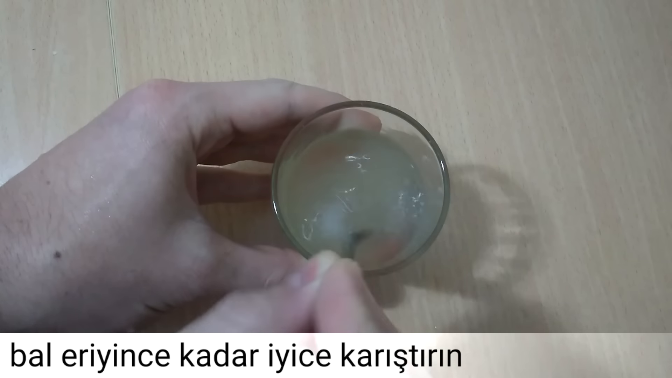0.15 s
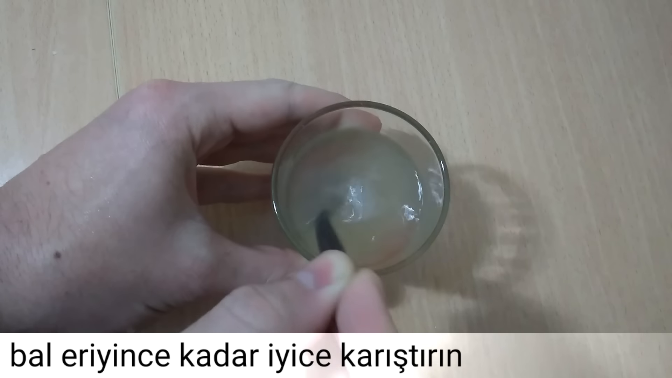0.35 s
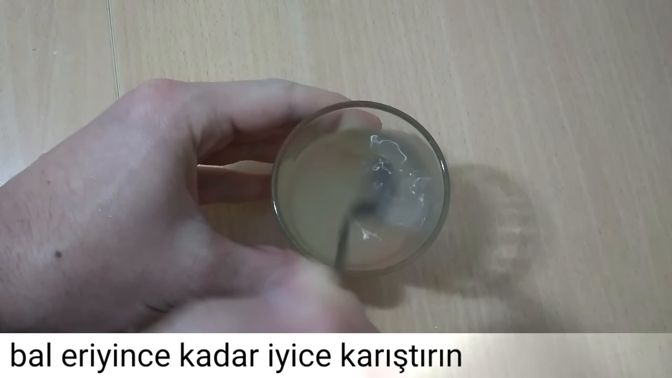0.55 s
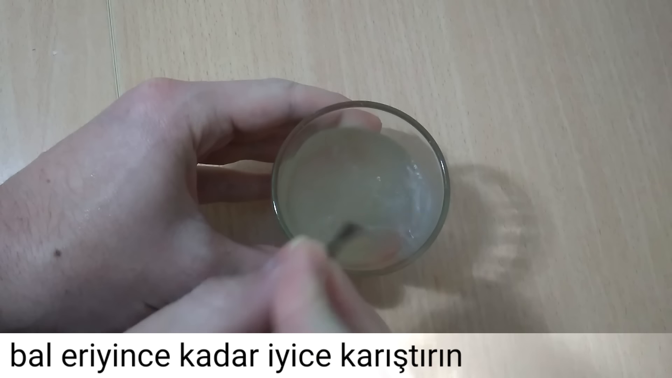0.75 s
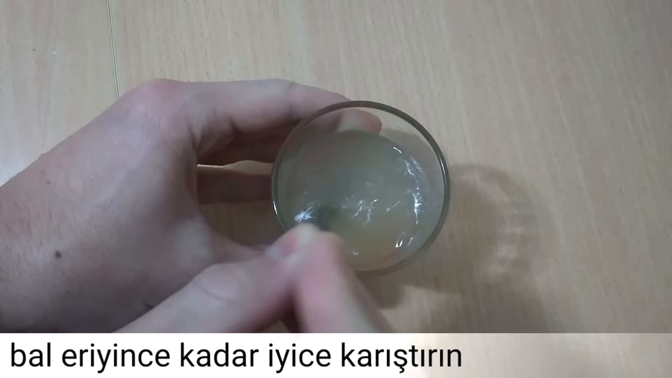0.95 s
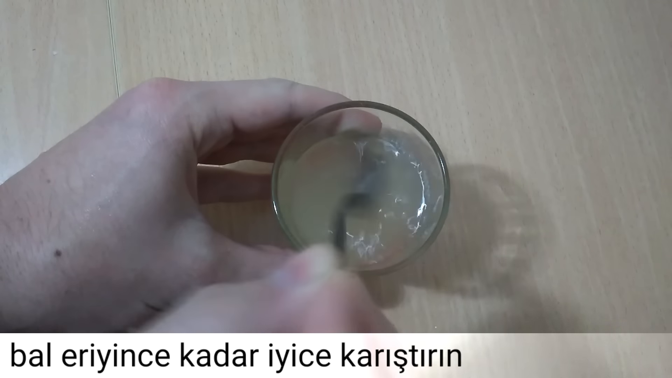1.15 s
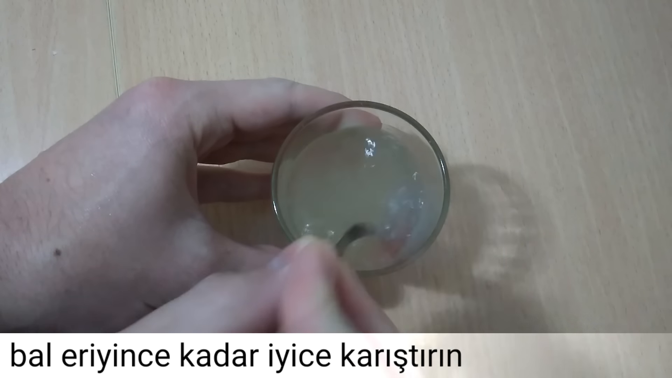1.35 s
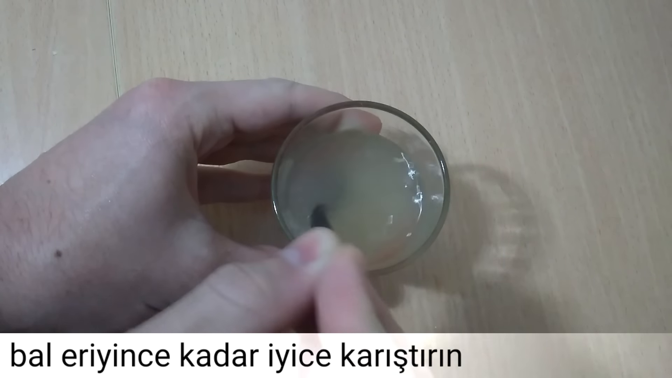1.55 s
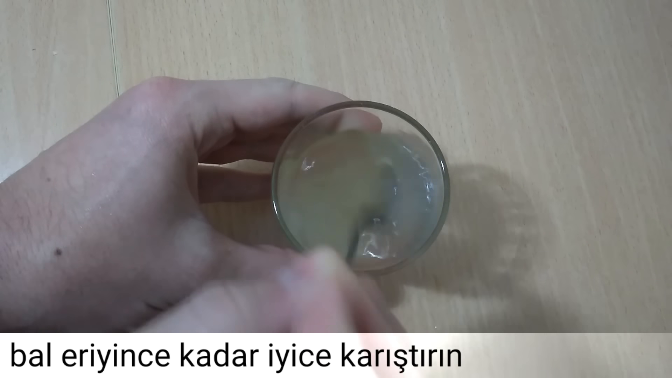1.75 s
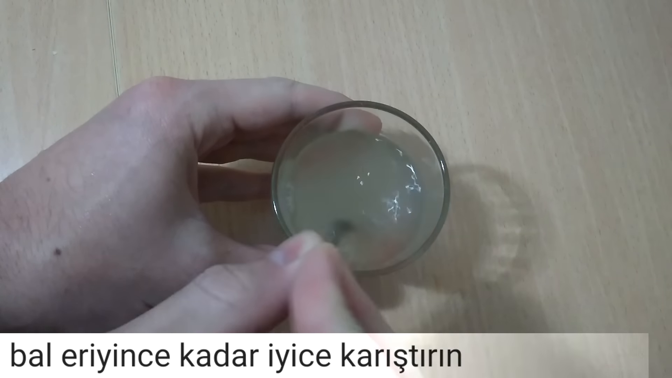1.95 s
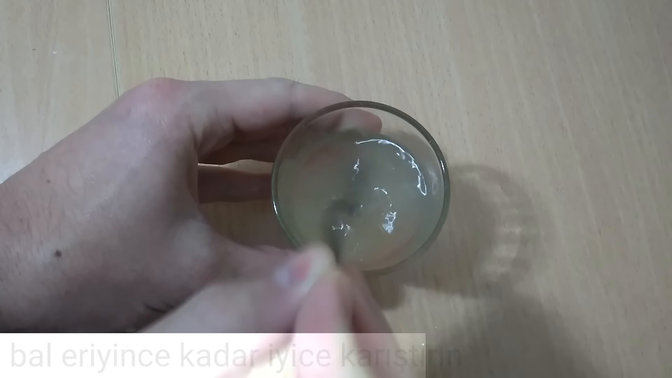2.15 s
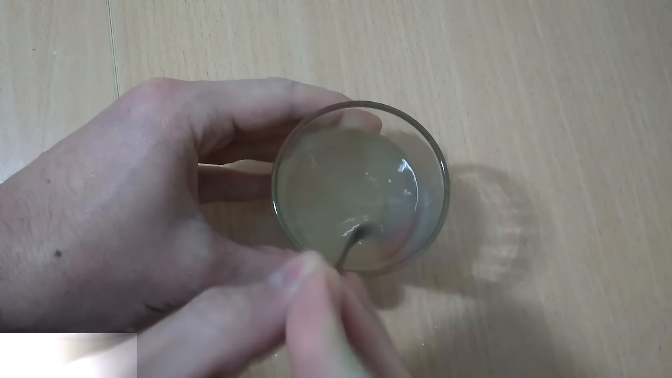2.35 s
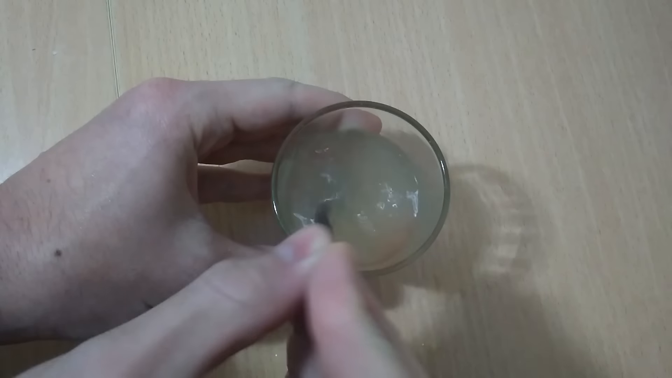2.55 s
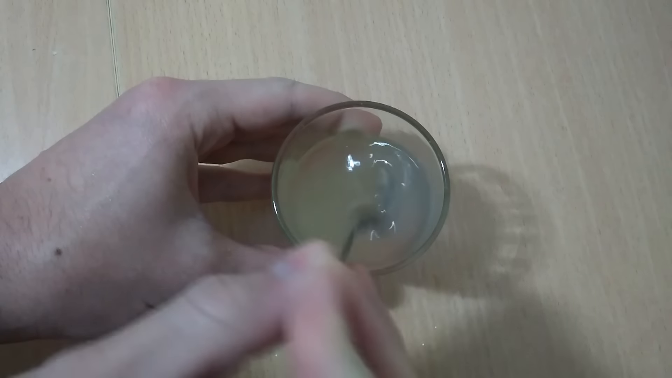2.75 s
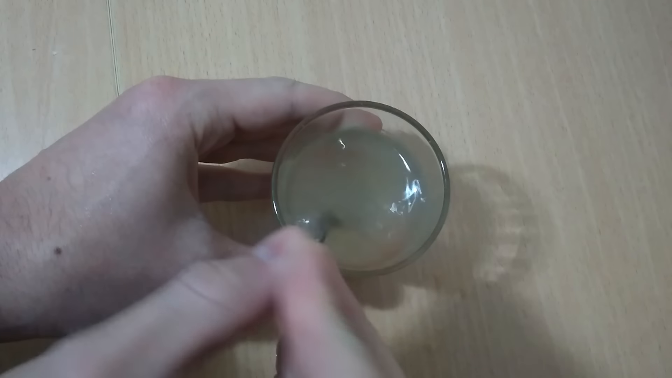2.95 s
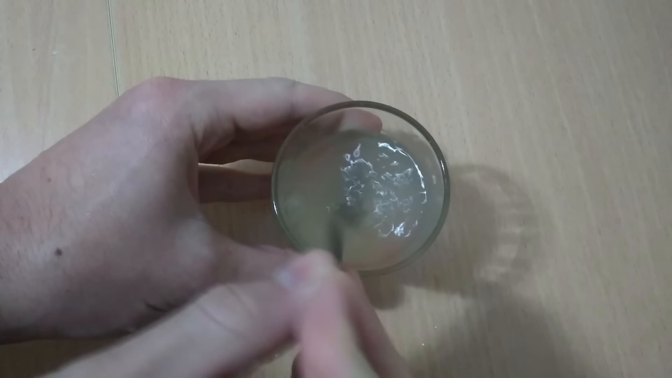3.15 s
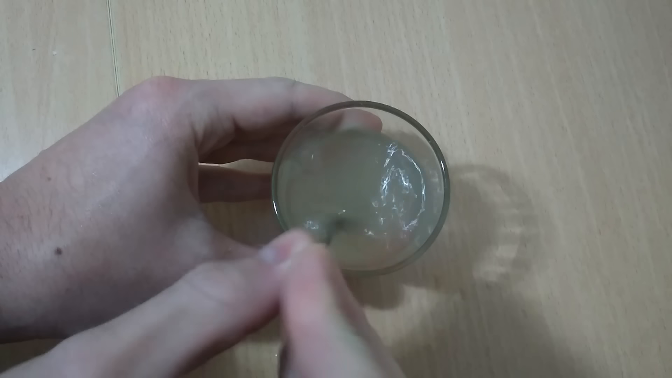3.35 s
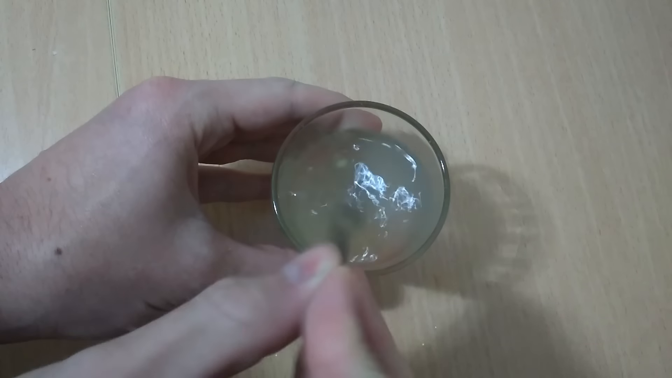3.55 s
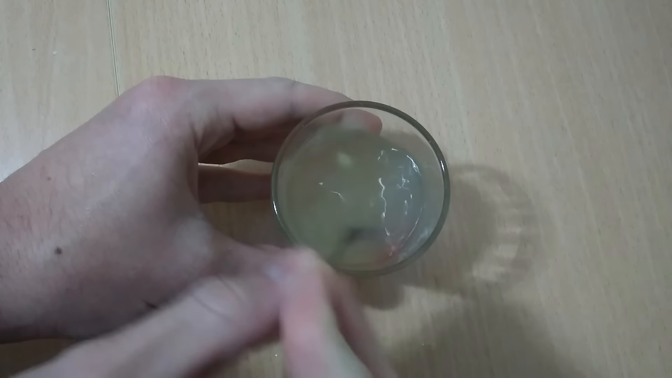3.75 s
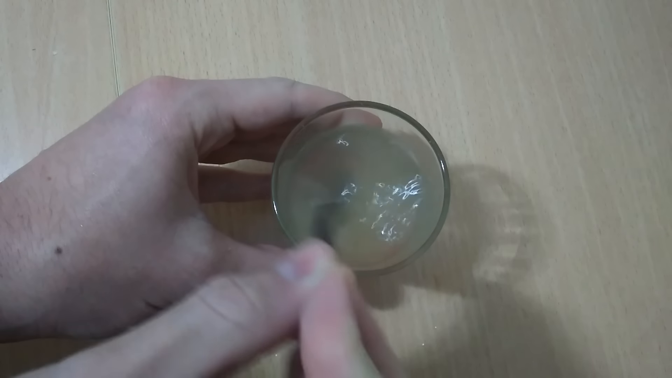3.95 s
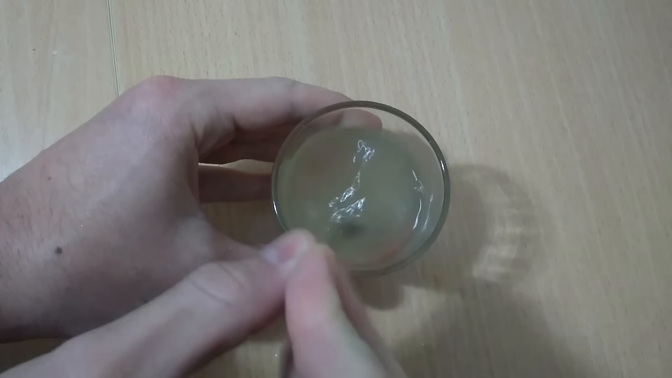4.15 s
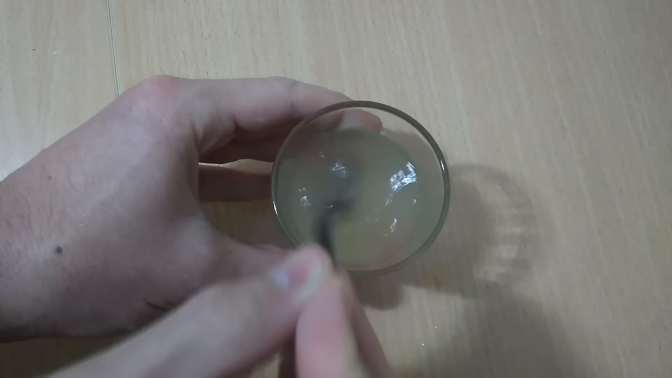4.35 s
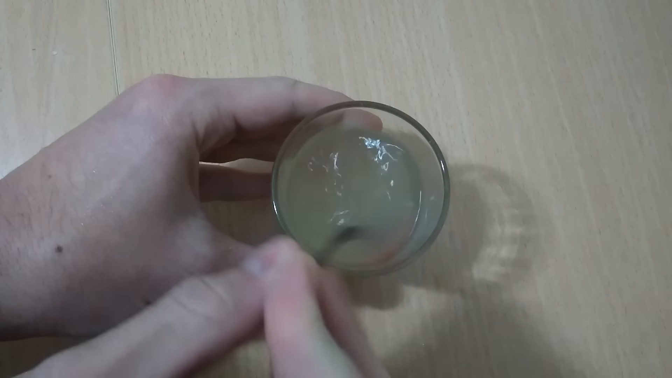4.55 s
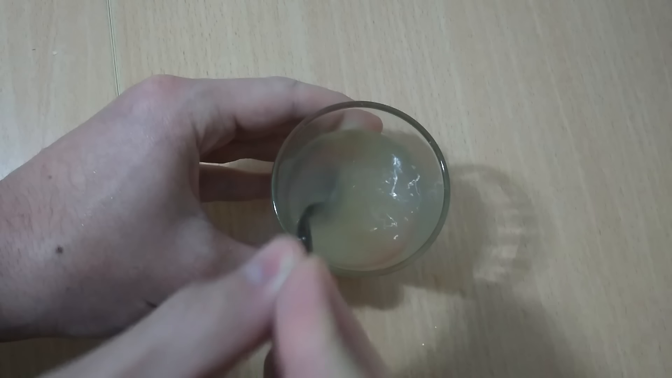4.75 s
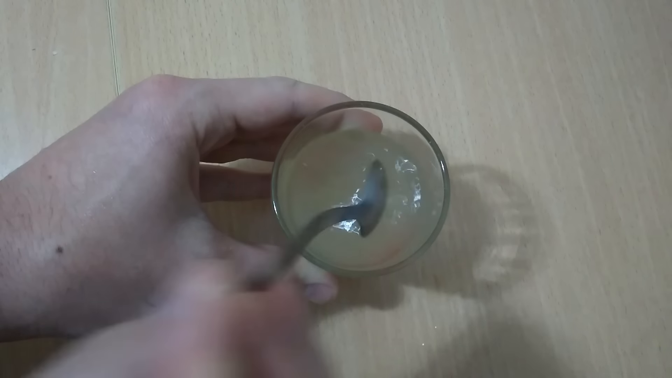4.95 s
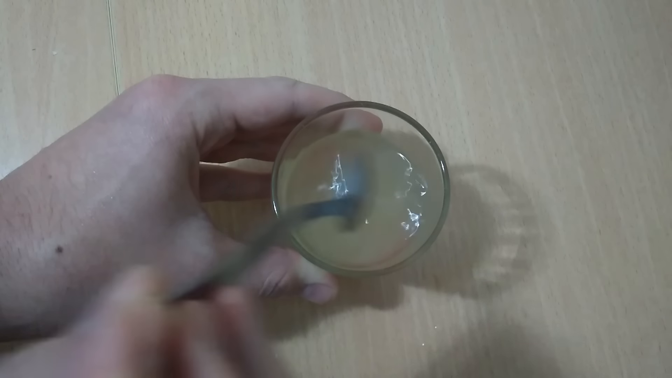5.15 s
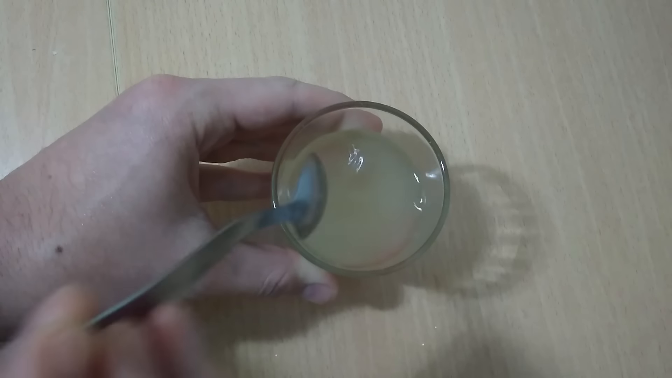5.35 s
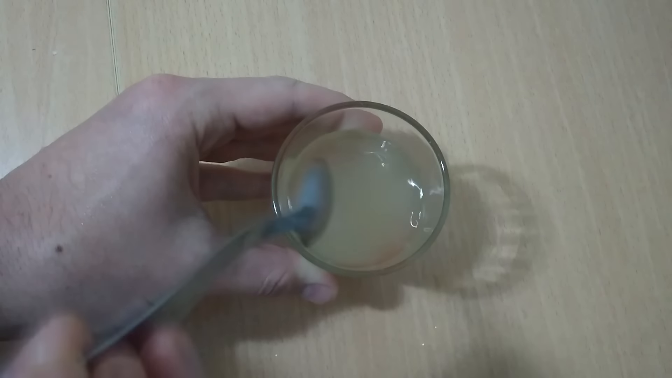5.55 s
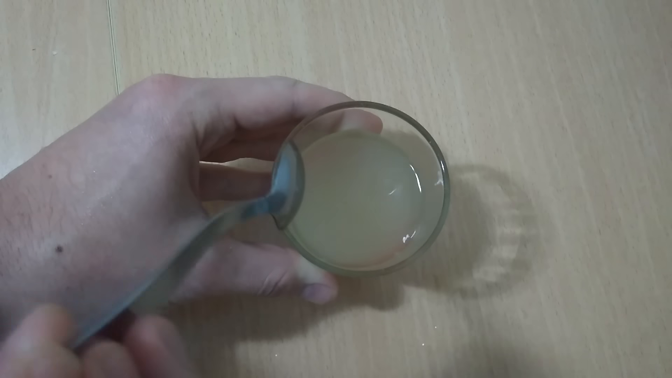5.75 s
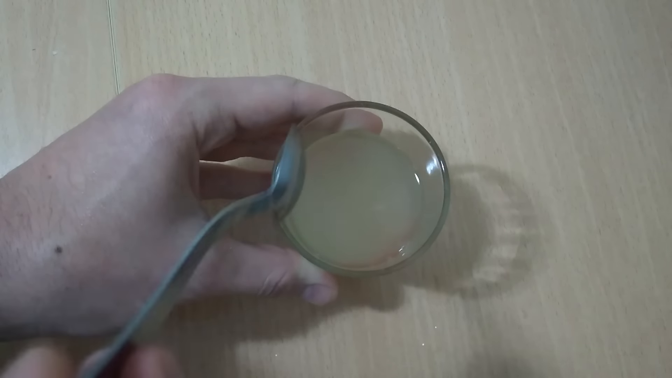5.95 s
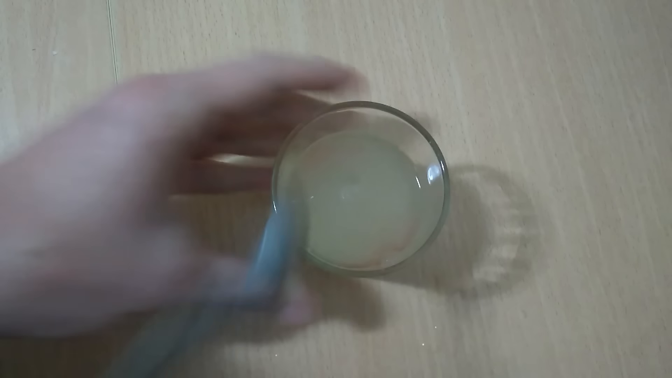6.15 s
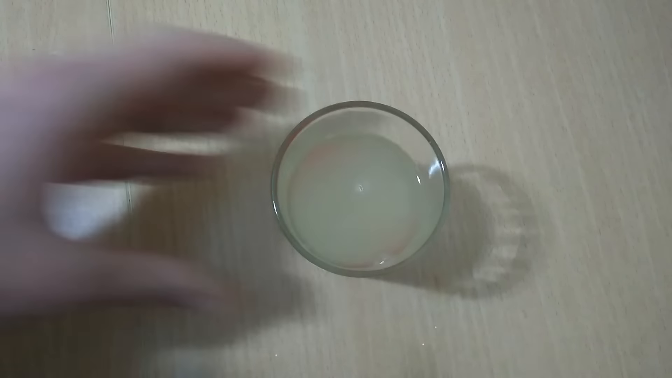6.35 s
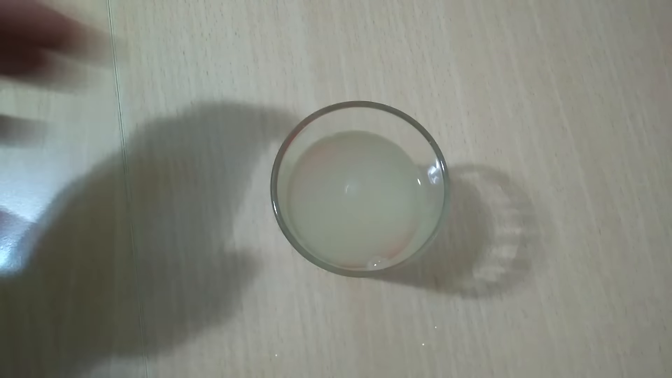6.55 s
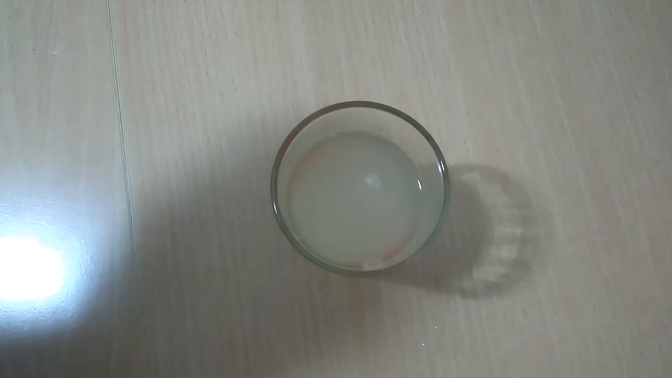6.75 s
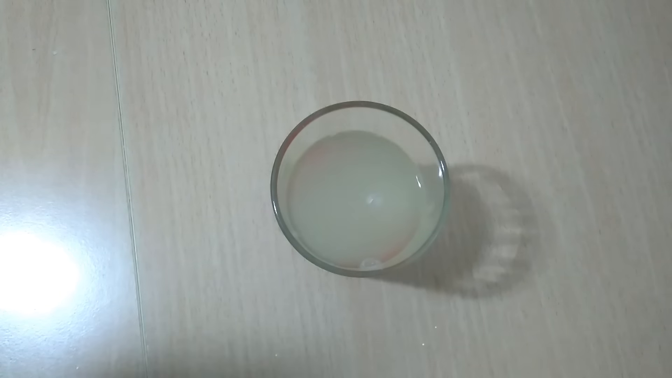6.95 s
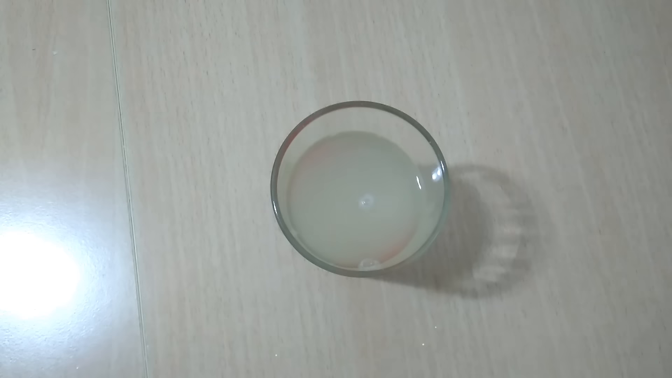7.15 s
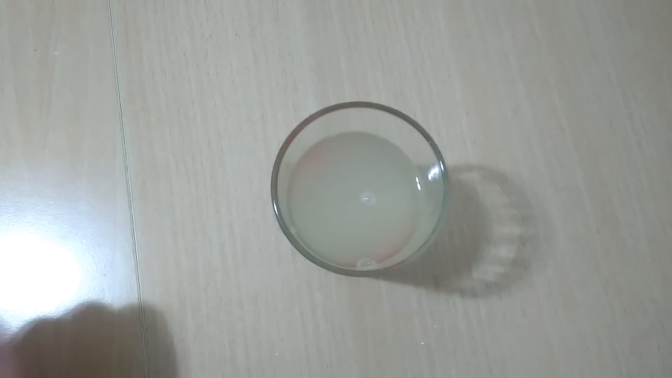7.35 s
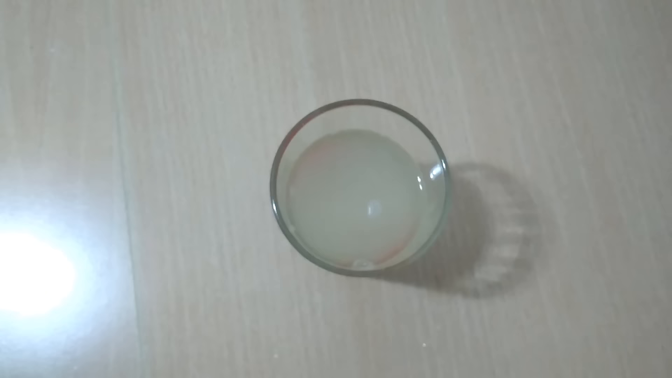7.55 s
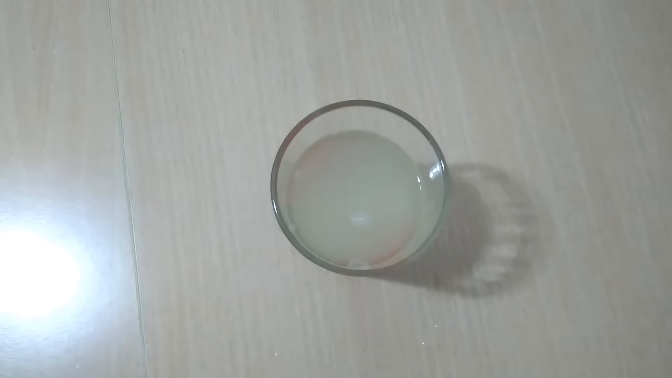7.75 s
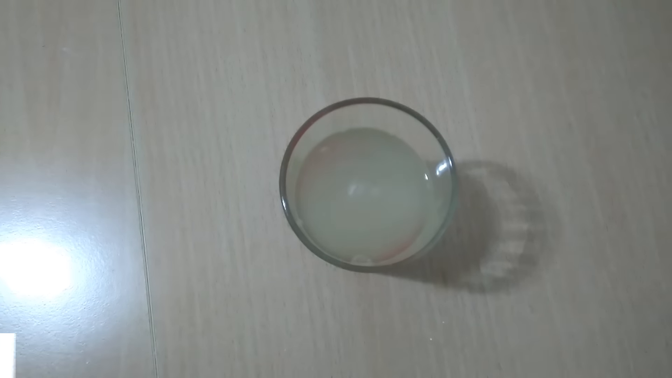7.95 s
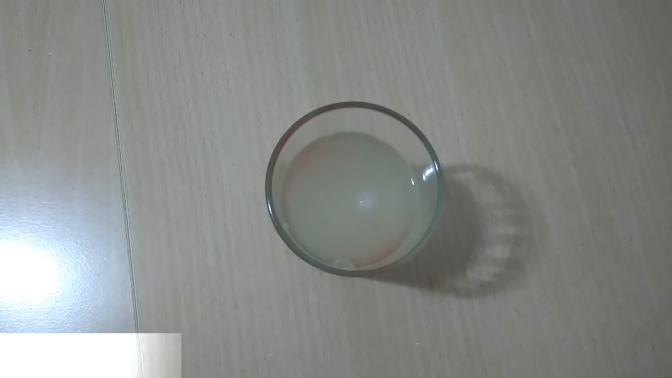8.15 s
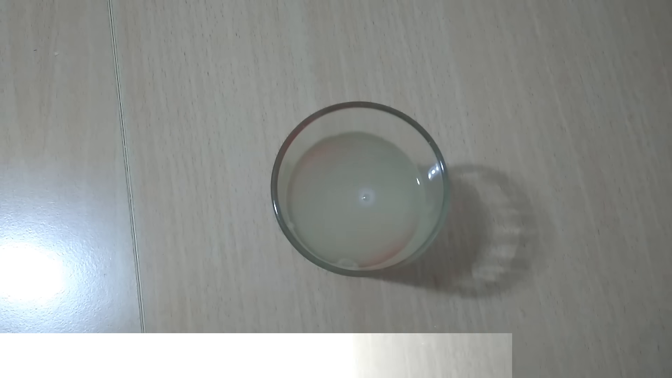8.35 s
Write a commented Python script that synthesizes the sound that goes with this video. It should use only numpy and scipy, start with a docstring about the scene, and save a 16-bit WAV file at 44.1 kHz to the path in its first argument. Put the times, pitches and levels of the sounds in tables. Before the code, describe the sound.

Indoors, a spoon circles in a held glass of liquid: short clinks in irregular pairs and clusters, little skids and soft sloshing between. Low electrical hum is strong at first, then weak beneath a steady hiss. After a short gap come sharp rim taps, a pause, and the spoon landing and bouncing to rest further from the microphone, with more room echo.

```python
"""A steel teaspoon stirs a drink in a hand-held glass, over a mains hum that soon drops and a steady faint hiss.
Each contact rings the damped glass and knocks the table; the sloshing drink bends the low wall tones.
Skids, bubbles and wash fill the gaps; then the spoon is lifted, with a soft bump, and taps the rim.
Last it clatters down further off, on resonances of its own. A small hard room answers every contact."""
import sys
import numpy as np
from scipy import signal
from scipy.fft import rfft, irfft
from scipy.io import wavfile
from scipy.ndimage import map_coordinates

SR = 44100
rng = np.random.default_rng(int(sys.argv[2]) if len(sys.argv) > 2 else 0)


def log_audio(samples):
    """Write samples as a 16-bit WAV file to the path given in sys.argv[1]."""
    # one column per channel
    frames = np.atleast_2d(samples).T
    # limit to full scale, then quantise
    limited = np.clip(frames, -1, 1)
    pcm = np.round(limited * 32767).astype(np.int16)
    wavfile.write(sys.argv[1], SR, pcm)


N = 370881
TIME = np.arange(N) / SR  # seconds through the scene
AGE = TIME[:SR // 2]  # seconds since a contact

# Modes of the glass with the spoon against it. Each row: frequency in Hz, relative level in dB, t60 in seconds.
GLASS_MODES = [(273, -2.5, 0.081), (385, -3, 0.1), (745.6, -13, 0.1), (1516, -1.5, 0.027),
               (1612, -3, 0.026), (2098, 1, 0.024), (2215, -1, 0.036), (2560, 4, 0.011), (3030, 6, 0.016),
               (3810, -5.5, 0.038), (4250, 1.5, 0.022), (4450, 4.5, 0.0093), (5140, -4, 0.026),
               (5465, -7.5, 0.019), (6280, -5, 0.021), (6720, 3.5, 0.017), (7054, 3, 0.012),
               (7350, 4, 0.013), (7770, -3, 0.0071), (8390, -2, 0.013), (9090, -2.5, 0.015),
               (9920, 1, 0.015), (10550, -5, 0.018), (12200, -10.5, 0.013), (12300, -18, 0.0091)]
# Upper edges in Hz of the knock, wall, rim, middle and bright families of modes; the top family lies above.
FAMILY_EDGES_HZ = [1000, 1850, 2400, 4800, 9000]


def undb(db):
    """Decibels to gain."""
    return 10 ** (np.asarray(db) / 20)


def unit(x):
    """Scale to unit energy."""
    return x / np.sqrt(np.sum(x ** 2) + 1e-18)


def blend(a, b, share):
    """Unit-energy mix in which b has the given share of the energy."""
    return unit(np.sqrt(1 - share) * unit(a) + np.sqrt(share) * unit(b))


def fade(t60):
    """Exponential decay of a struck thing, 60 dB down after t60 seconds."""
    return np.exp(-np.log(1000) * AGE / t60)


def touch(rise_s):
    """A contact builds up over a moment."""
    return 1 - np.exp(-(AGE / rise_s) ** 2)


def swell(s, width_s):
    """A smooth rise and fall around a time."""
    return np.exp(-((TIME - s) / width_s) ** 2)


def walk(rate, size):
    """Smooth random drift with a spread near 1, through `rate` random points a second."""
    knots = rng.standard_normal(int(size / SR * rate) + 4)
    return map_coordinates(knots, [np.arange(size) / SR * rate + 1], order=3, mode="nearest")


def band(x, lo_hz, hi_hz, order=2):
    """Butterworth band-pass."""
    edges = [lo_hz, min(hi_hz, SR / 2 - 1)]
    return signal.sosfilt(signal.butter(order, edges, "band", fs=SR, output="sos"), x)


def ring(hz, t60, bend=0):
    """One decaying mode of unit energy; bend shifts its pitch by a fraction as it rings."""
    phase = 2 * np.pi * np.cumsum(hz * (1 + bend + 0 * AGE)) / SR
    return unit(np.sin(phase + rng.uniform(0, 2 * np.pi)) * fade(t60))


def crack(lo_hz, hi_hz, t60):
    """The dense, quickly damped ringing of a contact: decaying band noise of unit energy."""
    return unit(band(rng.standard_normal(len(AGE)) * fade(t60), lo_hz, hi_hz))


def add(track, s, sound):
    """Mix a sound in at a time."""
    i = max(int(s * SR), 0)
    track[i:i + len(sound)] += sound[:max(N - i, 0)]


def stirring(lift_s=5.4):
    """The spoon circles in the drink, then is lifted and tapped on the rim; each contact is a clink."""
    # Spoon on glass. Each row: start in seconds, strength in dB before the common gain,
    # depth from 0 at the rim to 1 at the bottom, favoured ring in dB relative to the strength,
    # favoured ring in Hz, bright ring in Hz.
    clinks = [(0.285, -59.5, 0.63, 0.5, 2720, 7200), (0.3016, -55.5, .4, -1, 1600, 6400),
              (0.3924, -42, 0.72, -18, 5270, 6780), (0.4668, -57, 0.79, -17, 5070, 7000),
              (0.5184, -32.5, 0.68, -13, 2510, 6850), (0.941, -49, 0.49, -8, 5240, 7700),
              (1.0372, -35.5, 0.62, -19, 2170, 6920), (1.122, -37.5, 0.92, -26, 2820, 6500),
              (1.6677, -37.5, 0.73, -13, 5120, 7150), (1.7259, -41, 0.94, -20, 5110, 7000),
              (2.135, -61, 0.29, -26, 4670, 7700), (2.1666, -38.5, 0.62, 3, 6810, 6820),
              (2.2583, -35.5, 0.91, -8, 2110, 6900), (2.325, -45.5, 0.89, -10, 4270, 7500),
              (2.4169, -31.5, 0.19, -7, 5120, 7320), (2.424, -37, 0.56, -3, 3960, 7060),
              (2.6999, -46.5, 0.87, -17, 3210, 6600), (2.7167, -34, 0.87, -14.5, 4370, 5260),
              (3.149, -45.5, 0.77, -7.5, 4900, 7320), (3.2182, -38, 0.99, -12.5, 3080, 7500),
              (3.3669, -35.5, 0.77, 1.5, 3170, 7330), (3.566, -49, 0.54, -11, 3040, 6840),
              (3.6362, -37.5, 0.89, -12.5, 2990, 7050), (4.012, -41, 0.61, -16, 4500, 6570),
              (4.0391, -35.5, 0.56, -11, 1520, 6980), (4.1189, -46, 0.78, -15, 5300, 7270),
              (4.1631, -46, 0.21, -21.5, 3940, 7540), (4.2186, -28.5, 0.47, -18, 2880, 7066),
              (4.418, -53, .62, -13.5, 2860, 7100), (4.469, -39, 0.88, -12, 2560, 7120),
              (4.5128, -44, 0.91, -15, 2840, 7140), (4.6115, -31, 0.45, -4.5, 4420, 8330),
              (4.9291, -33, 0.38, -8.5, 5300, 7050), (5.0703, -30.5, 0.32, -7.5, 4370, 6550),
              (5.7305, -32.5, 0.17, -8.5, 5260, 6520), (5.9475, -29, 0, -19.5, 3950, 7160),
              (5.9515, -36, 0, -14.5, 2180, 7500), (5.9776, -29.5, 0.35, -4, 5500, 7740),
              (6.139, -40.5, 0.32, -24, 4870, 7960), (6.3804, -46, 0.25, -20, 2040, 7310)]
    out = np.zeros(N)
    for s, *blow in clinks:
        add(out, s, undb(26) * clink(*blow, swirl=float(s < lift_s)))
    return out


def clink(strength_db, depth, ring_db, ring_hz, clink_hz, swirl):
    """One contact: its depth sets each family of modes, bright near the rim and a dull knock near the bottom."""
    # How each family of modes answers a contact, by family name.
    # Each row: gain in dB at the rim, in dB at the waist, in dB at the bottom.
    answers = {"knock": (-34.5, -6, -0.65), "wall": (-26.5, -15.5, 0), "rim": (-16, -13, -13.5),
               "middle": (-23.5, -11, -23.5), "bright": (0, 0, -10), "top": (-4.5, -16, -42)}
    waist = 0.6  # depth below which the drink muffles the clink
    knock_db, wall_db, rim_db, middle_db, clink_db, top_db = (
        strength_db + np.interp(depth, [0, waist, 1], answer) for answer in answers.values())

    scatter_db, detune = 2.0, 0.008  # random spread of mode level, and of pitch as a fraction
    slosh = swirl * 0.02 * walk(24, len(AGE))
    families = np.zeros((len(FAMILY_EDGES_HZ) + 1, len(AGE)))
    for hz, db, t60 in GLASS_MODES:
        # the moving drink loads the low modes most
        bend = detune * rng.standard_normal() + slosh * min(2.5, (1500 / hz) ** 2)
        level = undb(db + scatter_db * rng.standard_normal())
        families[np.searchsorted(FAMILY_EDGES_HZ, hz)] += level * ring(hz, t60, bend)
    knock, wall, rim, middle, bright, top = families

    # the chattering point of contact favours two resonances
    chatter = 0.012 * walk(460, len(AGE))
    favoured = ring(ring_hz, 0.022, 0.025 * walk(500, len(AGE)))
    # steel on glass adds a dense crack
    knock = blend(knock, crack(260, 490, 0.11), 0.16)
    wall = blend(wall, crack(1240, 2000, 0.04), 0.31)
    middle = blend(middle, crack(2300, 5100, 0.056), 0.5)
    bright = blend(bright, crack(4500, 8200, 0.024), 0.33)
    bright = blend(bright, ring(clink_hz, 0.021, chatter), 0.37)
    top = blend(top, crack(7100, 11200, 0.016), 0.33)

    attack = touch(0.0012)
    parts = [(wall, wall_db - 0.5), (rim, rim_db - 3), (middle, middle_db),
             (favoured, strength_db + ring_db), (bright, clink_db), (top, top_db)]
    out = sum(undb(db) * unit(part * attack) for part, db in parts)
    # the low knock blooms a little late
    out += undb(knock_db - 4.5) * unit(knock * touch(0.0037))
    # the table top ticks, more while stirring, and shakes faintly
    out += undb(strength_db - 26.5 + 9 * swirl) * unit(crack(500, 1500, 0.029) * attack)
    out += undb(knock_db - 16.5) * unit(crack(30, 190, 0.39) * touch(0.01))
    # the circling spoon drags on for a moment with a fine grit
    grit = crack(1500, 6900, 0.3) * undb(4.2 * walk(300, len(AGE))) * touch(0.015)
    out += swirl * undb(clink_db - 21) * unit(grit)
    # the glass sings on: a wall tone, longer while stirring, a rim tone, higher when calm, and a bright tone
    song = undb(wall_db - 8) * ring(1545, 0.0322 + 0.161 * swirl, 1.5 * slosh)
    song += undb(rim_db - 7.5) * ring(2200 - 85 * swirl, 0.22, slosh / 3)
    bright_bend = detune / 2 * rng.standard_normal() + 0.3 * chatter
    song += undb(clink_db - 15 - 10 * swirl) * ring(5220, 0.35, bright_bend)
    return out + song * attack


def skids(grit_db=5):
    """Stick and slip chatter of the dragging spoon drives the high modes of the glass."""
    # Spoon dragging on the glass. Each row: start in seconds, length in seconds, level in dB.
    drags = [(1.168, 0.079, -62), (2.181, .015, -52.5), (2.432, 0.0087, -50), (3.157, 0.064, -59),
             (4.022, .012, -59.5), (4.216, 0.0085, -54), (5.967, 0.029, -39), (6.14, 0.016, -49),
             (6.267, 0.042, -55.5)]
    out = np.zeros(N)
    for s, length_s, db in drags:
        slips = rng.standard_normal(len(AGE)) * undb(grit_db * walk(870, len(AGE)))
        slips *= np.exp(-(AGE / length_s) ** 2) * touch(0.0013)
        body = sum(undb(mode_db) * ring(hz, t60) for hz, mode_db, t60 in GLASS_MODES
                   if hz > FAMILY_EDGES_HZ[3])
        rub = band(signal.fftconvolve(slips, body), 5000, 5900, order=1)
        # a longer drag carries more energy
        add(out, s, undb(db) * np.sqrt(length_s * SR) * unit(rub))
    return out


def drink(scuff_db=7, stop_s=4.3):
    """Small bubbles chirp upward over a noise wash; the drink gulps once and the spoon scuffs the bottom."""
    # Bubbles in the swirl. Each row: start in seconds, level in dB before the common gain, starting pitch in Hz.
    bubbles = [(1.868, -64, 1680), (2.887, -61, 2370), (3.097, -62.5, 1320), (3.101, -66, 2700),
               (3.149, -45, 1850), (3.752, -50.5, 1616), (3.819, -58.5, 2630), (4.162, -51.5, 1340),
               (4.189, -61, 2420)]
    out = np.zeros(N)
    for s, db, hz in bubbles:
        rise = 0.12 * (1 - fade(0.22))  # fraction of the pitch
        bubble = ring(hz, 0.05, rise) + undb(-12.5) * crack(1200, 4500, 0.044)
        add(out, s, undb(db + 22.5) * bubble * touch(0.0014))
    # the wash is strongest at the start and near 4.6 s, and runs on at a lower level
    wash_share = np.interp(TIME, [0, 1.5, 4.6, 5.3], [0.54, 0.36, 0.62, 0.35])
    wash = band(rng.standard_normal(N), 250, 2800, order=1) * undb(-68.5 + 0.82 * walk(6.3, N))
    gulp = undb(-33) * swell(1.201, 0.094) * band(rng.standard_normal(N), 154, 352)
    # the spoon scuffs the bottom now and then as it circles
    scuff_level = undb(-81.5 + scuff_db * np.tanh(walk(14, N)) + 3 * walk(250, N))
    scuff = scuff_level * band(rng.standard_normal(N), 2200, 3400)
    return out + wash_share * wash + gulp + scuff * (TIME < stop_s)


def putting_down(bounce_s=0.0028, bounce_db=-2, detune=0.015):
    """The spoon lands on tip and bowl, slides and rocks to rest; it rings thinly when free."""
    # Spoon put down further off. Each row: start in seconds, then three levels in dB before the common gains:
    # body, treble, ring of the free spoon.
    landings = [(7.265, -23, -27, -67), (7.748, -32, -44.5, -73), (7.94, -32.5, -35.5, -53),
                (8.109, -40.5, -45, -60), (8.262, -48.5, -55.5, -74), (8.396, -59, -63, -88.5)]
    # What the spoon is laid on. Each row: mode frequency in Hz, relative level in dB, t60 in seconds.
    rest_modes = [(570, -8.5, 0.01), (1688, 0.5, 0.041), (2190, -3.5, 0.029), (2304, 1.5, 0.024),
                  (2733, 7, 0.029), (3440, -9, 0.027), (3823, 8, 0.036), (4990, 0.5, 0.012),
                  (5610, 1, 0.013), (6160, 2, 0.011), (6870, 3.5, 0.042), (8200, -6, 0.01),
                  (9300, -19, 0.0084)]
    # Spoon sliding before it settles. Each row: middle in seconds, half length in seconds, level in dB.
    slides = [(7.573, 0.083, -62.5), (7.735, 0.038, -46.5)]
    out = np.zeros(N)
    for s, db, treble_db, ring_db in landings:
        for lag, blow_db in [(0, 0), (bounce_s, bounce_db)]:
            body = undb(db - 7) * crack(1490, 3400, 0.025) + undb(db - 17) * crack(360, 1020, 0.019)
            body += undb(treble_db - 2.5) * crack(3430, 7400, 0.014)
            for hz, mode_db, t60 in rest_modes:
                drive_db = db - 20.5 if hz < FAMILY_EDGES_HZ[3] else treble_db - 13
                body += undb(drive_db + mode_db) * ring(hz, t60, detune * rng.standard_normal())
            add(out, s + lag, undb(19.5 + blow_db) * body * touch(0.00087))
        free_ring = ring(10800, 0.62) + undb(4.5) * ring(6900, 0.55)
        add(out, s, undb(ring_db + 21) * free_ring * touch(0.0011))
    # sliding steel chatters against the surface
    chatter = rng.standard_normal(N) * undb(5.5 * walk(120, N))
    scrape = band(chatter, 1700, 1960) + undb(-14.5) * band(chatter, 800, 3800)
    return out + scrape * sum(undb(db) * swell(s, width_s) for s, width_s, db in slides)


def bump(s=5.51, width_s=0.06, db=-47):
    """A soft, low bump while the spoon is lifted: a swelling tone with noise around it."""
    thud = np.sin(2 * np.pi * 116 * TIME) + 5 * band(rng.standard_normal(N), 81, 155)
    return undb(db) * swell(s, width_s) * thud


def room_response(first_s=0.0067, side_db=-17):
    """Echoes that thicken into a short tail, each frequency region dying at its own pace."""
    # Reverberation of the room. Each row: frequency in Hz, t60 in seconds, reverberant level in dB.
    room_bands = [(150, 0.77, -5), (380, 0.32, 2), (550, 0.37, 3.5), (1010, 0.38, -0.5), (1700, 0.44, -5),
                  (3150, 0.29, -7.5), (4550, 0.31, -7), (7300, 0.28, -10.5), (9900, 0.32, -11.5),
                  (14000, 0.17, -12)]
    hz, t60, db = np.transpose(room_bands)
    # uneven early grains stand out as echoes
    grain = rng.standard_normal((2, len(AGE))) * np.exp(0.91 * rng.standard_normal(len(AGE)) * fade(0.077))
    spectrum = rfft(grain)
    log_hz = np.log(np.fft.rfftfreq(len(AGE), 1 / SR) + 1)
    tail = 0
    for share, decay, level_db in zip(np.eye(len(hz)), t60, db):
        shape = fade(decay) * touch(first_s)
        # overlapping bands that cross-fade between neighbouring rows
        part = irfft(spectrum * np.interp(log_hz, np.log(hz), share), len(AGE))
        tail = tail + undb(level_db) * part * shape / np.linalg.norm(grain[0] * shape)
    return tail[0] + undb(side_db) * np.outer([1, -1], tail[1])


def hum(waver_db=1.88):
    """Mains hum at 100 Hz with overtones, wavering once it has dropped; a thin whine swells and falls away."""
    # Level of the hum. Each row: time in seconds, RMS level in dB.
    hum_levels = [(0, -46), (1.17, -47), (1.42, -55), (2.25, -55.5), (2.6, -57.5), (3.95, -61),
                  (4.22, -54.5), (4.97, -62.5), (5.75, -61.5), (6.55, -61.5), (7.1, -64), (7.32, -60),
                  (8.41, -62.5)]
    # Steady overtones. Each row: multiple of the hum frequency, RMS level in dB.
    overtone_levels = [(2, -76), (3, -87.5), (5, -85)]
    loud = np.interp(TIME, [0, 1.2, 1.4], [1, 1, 0])
    level = undb(np.interp(TIME, *np.transpose(hum_levels)) + waver_db * (1 - loud) * walk(9, N))
    phase = 2 * np.pi * 100 * TIME + 0.06 * walk(3, N)
    overtones = sum(undb(db + 2 * walk(3.6, N)) * np.sin(k * phase) for k, db in overtone_levels)
    whine_share = np.interp(TIME, [0, 0.8, 1.2, 1.4], [0.072, 0.77, 0.81, 0.037])
    whine = undb(-73.5 + 2 * walk(12, N)) * whine_share * np.sin(2 * np.pi * 1262 * TIME)
    return np.sqrt(2) * (level * np.sin(phase) + overtones) + whine


def air(level_db=-74.5):
    """Steady room noise and hiss with a little rumble; only the hiss differs left and right."""
    # Colour of the still room. Each row: frequency in Hz, relative level in dB per Hz.
    air_colour = [(60, -1.5), (160, 0.5), (250, -11.5), (400, -8.5), (630, -2.5), (1000, -16), (2000, -34),
                  (3200, -27.5), (4800, -34.5), (6300, -17.5), (7800, -11), (10000, -23), (14500, -26)]
    hz, db = np.transpose(air_colour)
    bins = np.fft.rfftfreq(N, 1 / SR) + 1
    colour = undb(np.interp(np.log(bins), np.log(hz), db))
    # the treble is wider than the bass
    width = undb(np.interp(bins, [1000, 7000], [-13, -4]))
    mid = irfft(rfft(rng.standard_normal(N)) * colour, N)
    side = irfft(rfft(rng.standard_normal(N)) * colour * width, N)
    both = (mid + np.outer([1, -1], side)) / mid.std()
    rumble = undb(-48.5) * band(rng.standard_normal(N), 67, 210)
    return undb(level_db + 0.7 * walk(3.3, N)) * both + rumble


def scene():
    """The glass is close; the far clatter drives the room 7 dB harder for the same direct sound."""
    near = stirring() + skids() + drink()
    far = putting_down()
    room = signal.fftconvolve((near + undb(7) * far)[None], room_response(), axes=1)[:, :N]
    return near + far + room + bump() + hum() + air()


def record(dry, skew=0.1, top_hz=14300):
    """The channels are a fraction of a sample apart, which widens the treble a little; the top is cut."""
    side = skew * np.gradient(dry.mean(axis=0))  # shifts each channel by about skew samples, opposite ways
    top_cut = signal.ellip(8, 0.2, 70, top_hz, fs=SR, output="sos")
    return signal.sosfilt(top_cut, dry + np.outer([1, -1], side))


dry = scene()
out = record(dry)
log_audio(out)
```